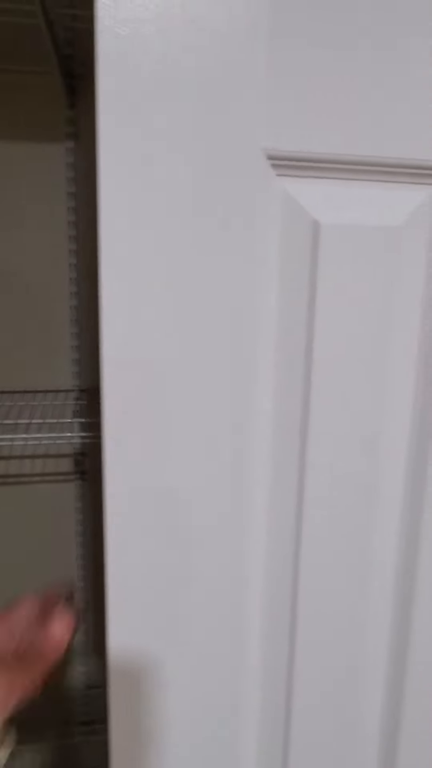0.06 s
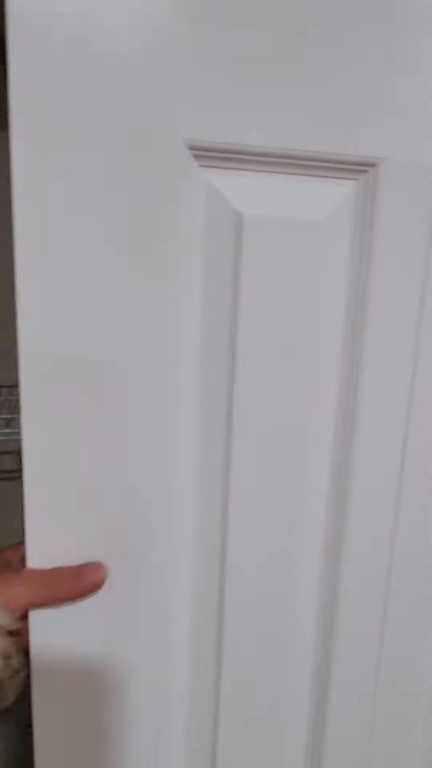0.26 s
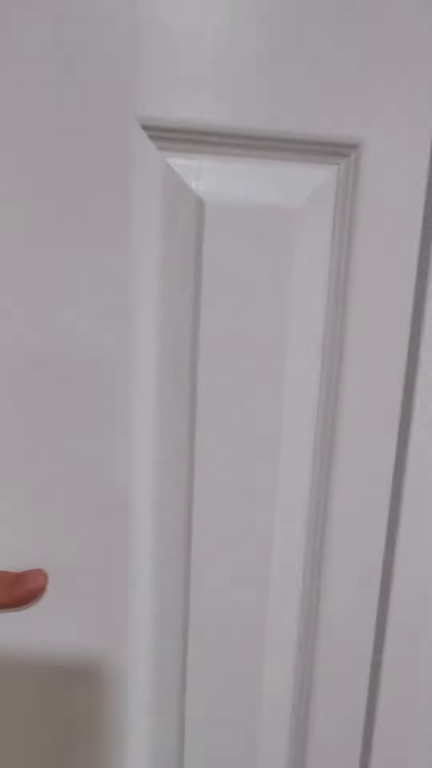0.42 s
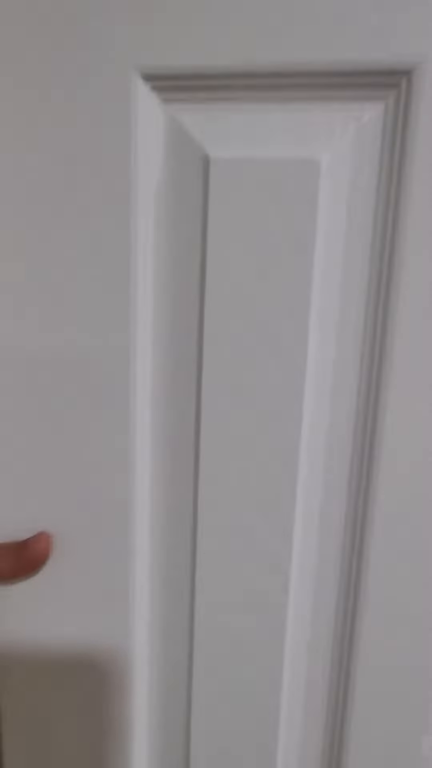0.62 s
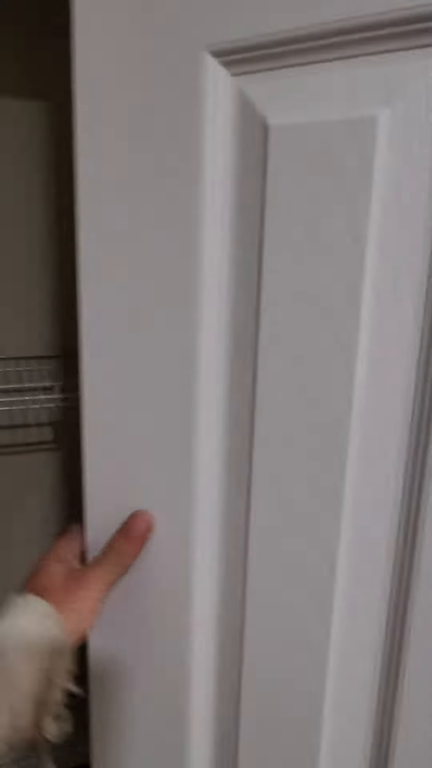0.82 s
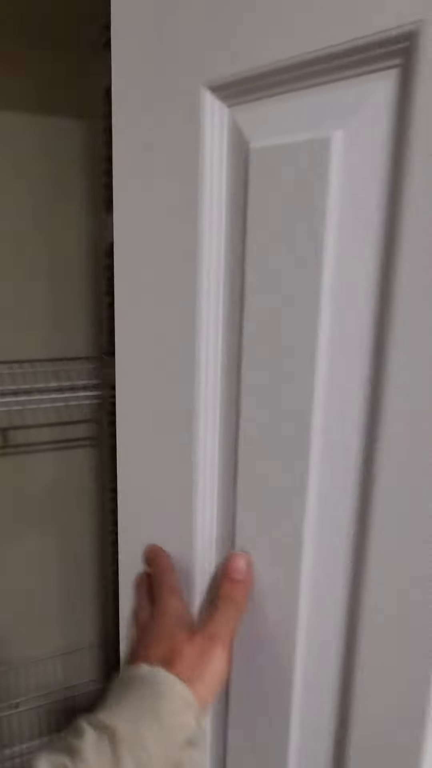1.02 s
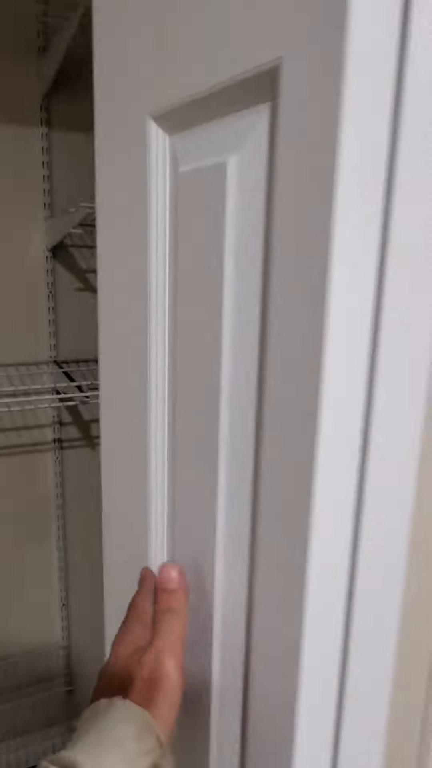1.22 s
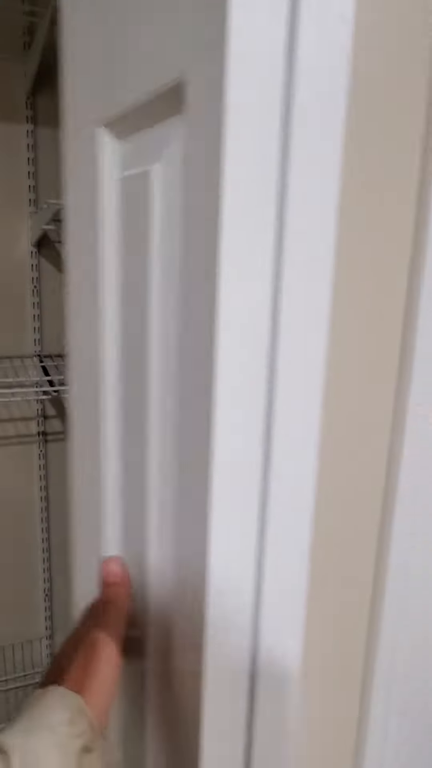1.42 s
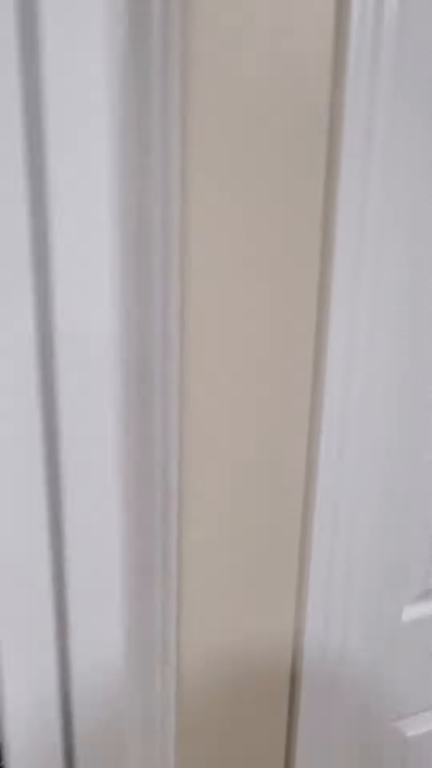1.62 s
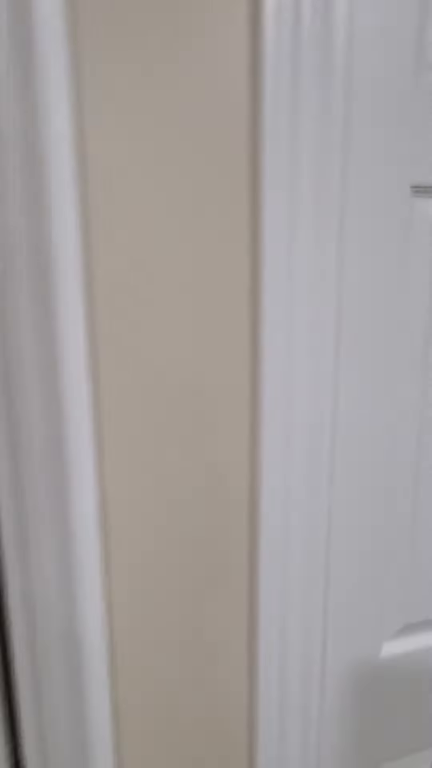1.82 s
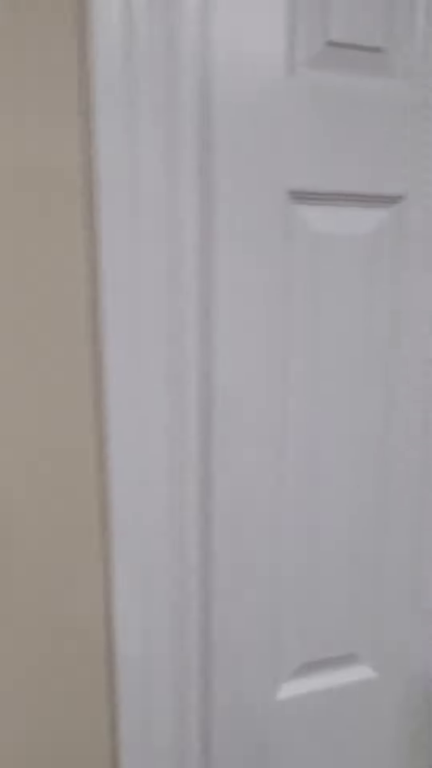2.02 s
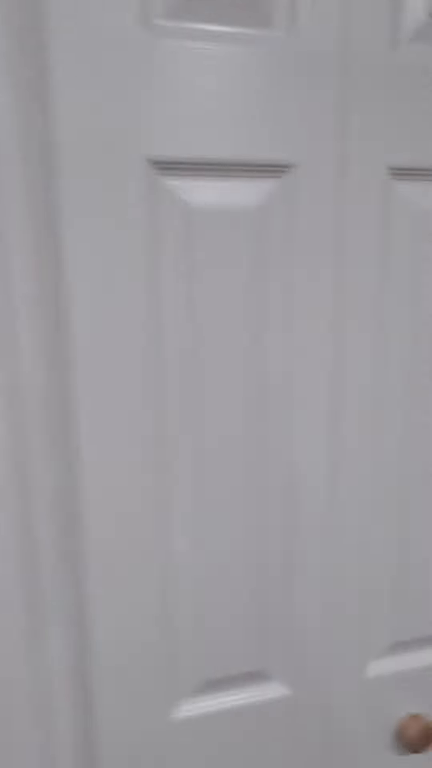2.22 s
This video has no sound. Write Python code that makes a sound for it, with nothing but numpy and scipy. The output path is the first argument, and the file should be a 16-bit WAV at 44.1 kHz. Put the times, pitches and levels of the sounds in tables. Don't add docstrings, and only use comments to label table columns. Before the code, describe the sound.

Hollow folding closet doors, heard close on a phone in a quiet, bare, echoing room. Faint ticks lead to a loud, clustered woody thud at 0.2 s, rattling until 0.4. A roller rumbles and hisses along its track, bumping softly around 0.75-0.9 and brushing again at 1.0. A softer double thud stops it at 1.4, a bright metal catch snaps at 1.7, and a dull knock follows at 2.0.

```python
import sys
import numpy as np
from scipy import signal
from scipy.fft import rfft, irfft, next_fast_len
from scipy.io import wavfile
from scipy.ndimage import uniform_filter1d

SR = 44100
rng = np.random.default_rng(int(sys.argv[2]) if len(sys.argv) > 2 else 0)


def volts_from_decibels(level):
    exponent = np.asarray(level, float) / 20
    return 10 ** exponent


def generate_wav(sig):
    pcm = np.round(np.clip(np.atleast_2d(sig).T, -1, 1) * 32767).astype(np.int16)
    wavfile.write(sys.argv[1], SR, pcm)


N = 101430
T = np.arange(N) / SR

# f/Hz, level/dB, t60/s
PANEL_MODES = [(48.7, -8, 0.33), (81, 1, 0.23), (107, -6.5, 0.29), (165, -5, 0.206), (206, -7.5, 0.077),
               (238.5, -6, 0.22), (276.8, -1.5, .12), (340, -1.5, 0.23), (412, -1.5, 0.23),
               (436, 1.5, 0.16), (490, 7.5, 0.12), (522, 8, 0.078), (650, -21, 0.062), (796, -8, .06)]


def curve(points, hz, column=1):
    p = np.array(points, float)
    return np.interp(np.log(np.maximum(hz, 1)), np.log(p[:, 0]), p[:, column])


def shape(x, db_of):
    size = next_fast_len(x.shape[-1] + 4096)
    gain = volts_from_decibels(db_of(np.arange(size // 2 + 1) * SR / size))
    return irfft(rfft(x, size) * gain, size)[..., :x.shape[-1]]


def causal(x, db_of):
    size = 8192
    cep = irfft(np.log(volts_from_decibels(db_of(np.arange(size // 2 + 1) * SR / size))), size)
    cep[1:size // 2] *= 2
    cep[size // 2 + 1:] = 0
    return irfft(rfft(x, size) * np.exp(rfft(cep)), size)


def unit(x):
    return x / np.sqrt(np.mean(x ** 2))


def peak(x):
    return x / np.abs(x).max()


def ring(x, hz, t60):
    r = np.exp(-np.log(1000) / (max(t60, .001) * SR))
    w = 2 * np.pi * hz / SR
    return signal.lfilter([np.sin(w)], [1, -2 * r * np.cos(w), r * r], x)


def walk(rate_hz):
    k = int(SR / rate_hz)
    smooth = uniform_filter1d(uniform_filter1d(rng.standard_normal(N + SR), k), k)
    return unit(smooth)[:N]


def add(out, s, x):
    i = max(int(s * SR), 0)
    out[i:i + len(x)] += x[:N - i]


def burst(noise, decay_s):
    t = T[:len(noise)]
    for _ in range(6):
        spectrum = rfft(noise * t * np.exp(-t / decay_s))
        noise = irfft(spectrum / np.abs(spectrum))
        noise = noise / (uniform_filter1d(np.abs(noise), size=24) + 1e-4)
    return irfft(spectrum / np.sqrt(uniform_filter1d(np.abs(spectrum) ** 2, size=5)))


def knocks():
    # t/s, level/dB, favoured f/Hz, spread/octaves, push/ms
    hits = [(.002, -37.5, 61.6, 0.49, 2.8), (0.187, -28, 73, 0.27, 5.7), (0.2131, -5.5, 213, 0.5, 1.4),
            (0.2168, -8, 260, 0.3, 1.64), (0.2221, -10.5, 278, .2, 1.55), (.221, -26.5, 480, 0.45, 0.58),
            (0.2394, -16.5, 302, 0.49, 0.8), (0.246, -20.5, 71.12, 0.58, 4.8), (.254, -20, 397, 0.8, 0.78),
            (0.2784, -14.5, 274, 0.17, 1.33), (0.2933, -18.5, 423, 0.27, 1.97), (.318, -22.5, 291, 0.24, 1),
            (.349, -22.5, 282, 0.42, 1.4), (0.376, -22.5, 84, 0.77, 3.7), (0.499, -28.5, 102, 0.6, 1.5),
            (0.641, -26.5, 203, 1.1, 2.1), (0.683, -30, 76.5, 0.52, 7.1), (0.741, -21.5, 166, 0.61, 2.2),
            (0.821, -32, 400, 0.11, 1.7), (.842, -37, 412, 0.18, 1.7), (.864, -29.5, 412, 0.11, 1.5),
            (.884, -29.5, 422, 0.22, 1.9), (.906, -38, 436, .15, 1.5), (.928, -35, 436, 0.2, 1.5),
            (1.026, -28.5, 150.5, 0.65, 1.1), (1.241, -34.5, 78, 0.15, 2.8), (1.259, -29, 525, 0.57, 0.54),
            (1.356, -27, 278, 0.13, 1), (1.3639, -23.5, 556, 0.87, 0.57), (1.4, -30, 165, 0.48, 1.4),
            (1.408, -13.5, 175, 0.33, 1.2), (1.432, -23.5, 80.6, 0.3, 4.8), (1.434, -19, 172, 0.43, 1.6),
            (1.468, -17, 150, 0.58, 2.8), (1.496, -25.5, 100, 0.52, 1.7), (1.534, -28, 93, .4, 2.4),
            (2.033, -33, 220, 0.57, 2), (2.066, -32, 340, 0.47, 0.94)]
    crack_db, crack_s, crack_ratio, crack_slope_db = -9.5, 0.0027, 1.88, 13
    out = np.zeros(N)
    for (s, db, hz, octaves, ms), noise in zip(hits, rng.standard_normal((len(hits), 2048))):
        push = np.zeros(SR)
        width = int(ms * SR / 1000) + 2
        push[:width] = np.hanning(width) / width
        detune = 1 + .006 * noise
        body = np.zeros(SR)
        for k, (f, mode_db, t60) in enumerate(PANEL_MODES):
            favour_db = -16.2 * (np.log2(f / hz) / octaves) ** 2
            body += volts_from_decibels(mode_db + favour_db) * ring(push, f * detune[k], t60)
        add(out, s, volts_from_decibels(db) * peak(body))
        crack = causal(burst(noise, crack_s),
                       lambda f: -crack_slope_db * np.abs(np.log2((f + 1) / hz / crack_ratio)))
        add(out, s, volts_from_decibels(db + crack_db) * peak(crack))
    return out


def slide():
    # t/s, level/dB, brightness/dB
    motion = np.array([(0, -64, 6.5), (.18, -109, 21), (0.209, -56.5, -18.5), (.34, -48.5, -2),
                       (.5, -53.5, -0.5), (.6, -56.5, 1), (0.681, -47, 3.5), (.74, -48.5, -2),
                       (.87, -46.5, 13), (0.911, -51.5, 12), (1.001, -55, -2.5), (1.021, -45, 8.5),
                       (1.151, -52, 8.5), (1.203, -51.5, 2), (1.34, -56.5, -5.5), (1.499, -55.5, -6),
                       (1.678, -68.5, -7.5), (1.95, -61.5, 46)])
    # f/Hz, density/dB per Hz
    hiss_colour = [(350, -36), (600, -8.5), (1290, -6), (1770, -3), (2800, -12.5), (4870, -5.5),
                   (15000, -13), (15800, -7.5), (16500, -54)]
    rumble_colour = [(15, -30), (25, -1), (129, -7), (213, 8.5), (415, 4.5), (730, -11.5), (961, -7),
                     (1500, 3), (1950, -51), (3300, -120)]
    hiss_db, rumble_db, jolts_per_s, wander_db = 1.5, 6, 500, 4.5
    effort_db = np.interp(T, motion[:, 0], motion[:, 1])
    bright_db = np.interp(T, motion[:, 0], motion[:, 2])

    hiss = shape(rng.standard_normal(N), lambda f: curve(hiss_colour, f) - 40 * (f < 600))
    hiss = unit(hiss) * volts_from_decibels(0.75 * walk(23))

    jolts = (rng.random(N) < jolts_per_s / SR) * rng.standard_normal(N) * 8
    jolts = jolts + rng.standard_normal(N)
    body = sum(ring(jolts, f, 0.02) for f, _, _ in PANEL_MODES)
    rumble = unit(shape(body, lambda f: curve(rumble_colour, f)))
    rumble = rumble / np.sqrt(uniform_filter1d(rumble ** 2, size=SR // 12))
    rumble = rumble * volts_from_decibels(wander_db * walk(7.3))
    return volts_from_decibels(effort_db) * (volts_from_decibels(hiss_db) * hiss + volts_from_decibels(rumble_db - bright_db) * rumble)


def snap():
    # f/Hz, width/Hz, level/dB
    resonances = [(3350, 434, -0.5), (3930, 230, -6.5), (4930, 340, -13.5), (5530, 470, -6.5),
                  (6400, 200, -14), (7900, 400, -23), (10700, 330, -19), (14070, 700, -20)]
    # f/Hz, level/dB
    floor = [(300, -14), (800, -18.5), (2200, -17), (4500, -10), (7000, -12.5), (9000, -19), (15500, -19),
             (16500, -48)]
    snap_s, snap_db, decay_s = 1.7186, -6, 0.001

    def colour(f):
        power = volts_from_decibels(curve(floor, f)) ** 2
        for hz, width_hz, db in resonances:
            power = power + volts_from_decibels(db) ** 2 / (1 + (2 * (f - hz) / width_hz) ** 4)
        return 10 * np.log10(power)

    out = np.zeros(N)
    chatter = burst(rng.standard_normal(2048), decay_s)
    add(out, snap_s, volts_from_decibels(snap_db) * peak(causal(chatter, colour)))
    return out


def ticks():
    # t/s, peak/dB, centre f/Hz, width/octaves
    clicks = [(0.107, -45.5, 3040, 1.2), (0.13, -44, 1860, 0.71), (0.142, -49, 1660, 0.94),
              (0.157, -44.5, 1530, 0.52), (0.191, -36.5, 2820, 1.8), (0.2024, -39, 2500, 1.3),
              (0.2211, -25, 4180, 1.9), (0.2238, -30, 4500, 2.2), (.235, -35, 3680, .5),
              (0.2746, -29, 4600, 0.81), (0.2766, -29, 2480, 0.5), (.28, -34, 2820, 0.67),
              (0.3084, -14.5, 10700, 1.83), (.314, -27, 14500, 2), (0.4975, -35.5, 2430, 0.58),
              (.492, -32, 4400, 0.9), (.4988, -34, 4580, 0.37), (.679, -31.5, 4680, 0.15),
              (0.678, -33, 5800, .12), (0.7339, -27, 4730, 0.2), (0.7335, -26.5, 6200, 0.32),
              (.7339, -33.5, 3550, 0.2), (0.8387, -35, 4900, 0.54), (.856, -40, 4900, 0.2),
              (.864, -49, 5000, 0.24), (1.0139, -30.5, 4460, 0.63), (.503, -43.5, 13400, 0.45),
              (0.4989, -34.5, 1370, 0.42), (1.3572, -32.5, 5070, 0.62), (1.3628, -21, 6300, 1.75),
              (1.396, -18.5, 3290, 1.18), (1.4005, -26, 3570, 1.1), (1.408, -30, 2980, 1.1),
              (1.3974, -29, 14200, 0.38), (2.0259, -29, 587, 1.85), (.215, -24, 650, 0.62),
              (.739, -37, 1480, 0.22), (1.3648, -21.5, 590, 1.9), (1.399, -26.5, 565, 0.79)]
    decay_s = .0012
    out = np.zeros(N)
    for (s, db, hz, octaves), noise in zip(clicks, rng.standard_normal((len(clicks), 2048))):
        def colour(f):
            band_db = np.maximum(-12 * (np.log2((f + 1) / hz) / octaves) ** 2, -42)
            return band_db - 20 * np.log10(1 + (300 / (f + 1)) ** 2)

        add(out, s, volts_from_decibels(db) * peak(causal(burst(noise, decay_s), colour)))
    return out


def bumps():
    # t/s, peak/dB, f/Hz
    thuds = [
        (0.7581, -29, 140),
        (0.7774, -22, 193),
        (.797, -32, 173),
        (.815, -24.5, 172),
        (.833, -27.5, 222),
        (1.365, -24, 560),
        (2.0277, -27.5, 539),
    ]
    t60_cycles = 2.2
    out = np.zeros(N)
    for s, db, hz in thuds:
        cycles = T[:4096] * hz
        decay = np.exp(-np.log(1000) * cycles / t60_cycles)
        add(out, s, -volts_from_decibels(db) * peak(cycles * decay * np.sin(2 * np.pi * cycles)))
    return out


def wide(pair):
    mono_hz = 480
    side = shape(pair[1], lambda hz: -10 * np.log10(1 + (mono_hz / (hz + 1)) ** 3))
    return np.array([pair[0] + side, pair[0] - side]) / np.sqrt(2)


def air():
    # f/Hz, density/dB per Hz
    air_colour = [(15, -19), (25, -6), (121, 1), (1470, -7), (2820, -23.5), (4480, -21), (9580, -50),
                  (15200, -35), (16500, -48)]
    level_db = -52 + 1.0 * walk(1.1)
    noise = shape(rng.standard_normal((2, N)), lambda f: curve(air_colour, f))
    return volts_from_decibels(level_db) * unit(wide(noise))


def room(x, wet_db):
    # f/Hz, t60/s, level/dB
    reverb = [(57.6, 1.28, 7), (140, 0.72, 2), (248, 0.58, 3), (450, 1.08, 6), (840, 1.29, 7.5),
              (3450, 1.096, 1), (5800, 0.94, 2.5), (9800, 1.12, -16.5), (14600, 0.49, 7.5)]
    # delay/s, level/dB
    echoes = [
        (0.0147, -10),
        (0.03, -18.5),
        (0.041, -10),
    ]
    # f/Hz, left minus right/dB
    pan = [(200, 1.5), (1000, 3), (3000, 16), (8000, 7.5), (14000, 16.5)]
    gap_s, build_s, right_lag_s = 0.002, 0.00087, .0004
    t = T[:SR]
    noise, tail = wide(rng.standard_normal((2, SR))), 0
    for hz in 45 * 2 ** np.arange(0, 9, .5):
        band = shape(noise, lambda f: -24 * np.log2((f + 1) / hz) ** 2)
        decay_db = curve(reverb, hz, column=2) - 60 * t / curve(reverb, hz)
        tail = tail + band * volts_from_decibels(decay_db)
    tail = tail * np.clip((t - gap_s) / build_s, 0, 1) / np.sqrt(SR * .1)
    port_shifts_s = rng.uniform(-0.00045, 0.00027, (len(echoes), 2))
    for (s, db), shift_s in zip(echoes, port_shifts_s):
        tail[[0, 1], ((s + shift_s) * SR).astype(int)] += volts_from_decibels(db - wet_db)
    lag = int(right_lag_s * SR)
    left = shape(x, lambda f: curve(pan, f) / 2)
    right = shape(x, lambda f: -curve(pan, f) / 2)
    direct = np.array([left, np.pad(right, (lag, 0))[:N]])
    wet = signal.fftconvolve(x[None], tail, axes=1)[:, :N]
    return direct + volts_from_decibels(wet_db) * wet


def scene():
    doors = room(knocks(), -12) + room(ticks(), -1)
    track = room(slide(), -0.5)
    catch = room(snap(), 0.94)
    return doors + track + catch + air() + room(bumps(), -15)


def low_pass(x):
    return signal.sosfilt(signal.butter(12, 16960, fs=SR, output="sos"), x)


def record(dry):
    low_cut_hz, top_hz, top_drop_db = 37, 15800, 32
    dry = signal.sosfilt(signal.butter(2, low_cut_hz, "high", fs=SR, output="sos"), dry)
    dry = signal.sosfilt(signal.ellip(6, .5, top_drop_db, top_hz, fs=SR, output="sos"), dry)
    return low_pass(dry)


dry = scene()
out = record(dry)
generate_wav(out)
```